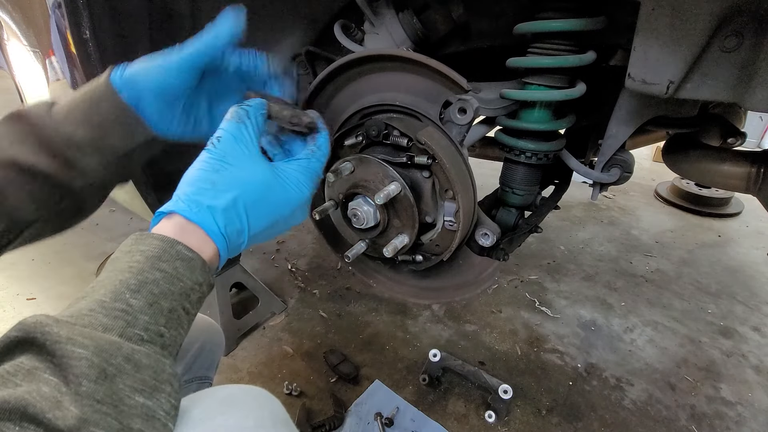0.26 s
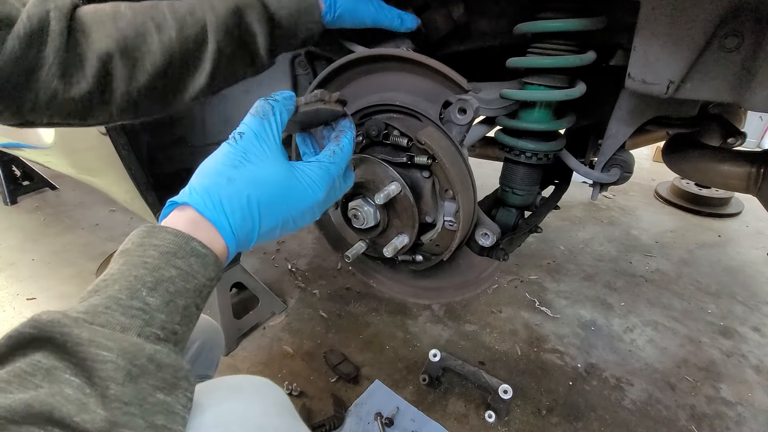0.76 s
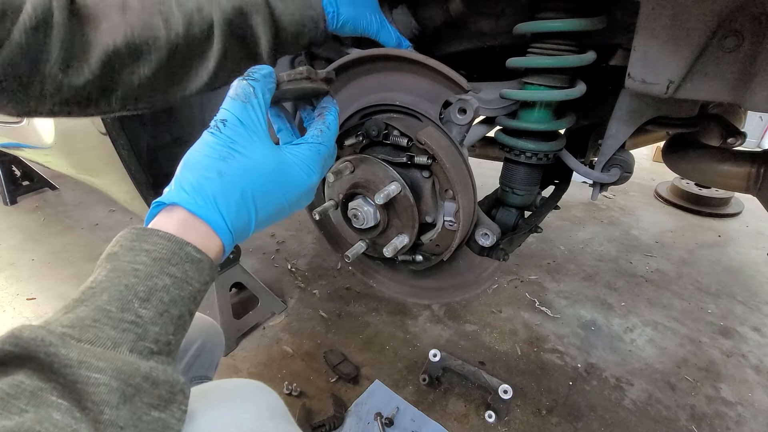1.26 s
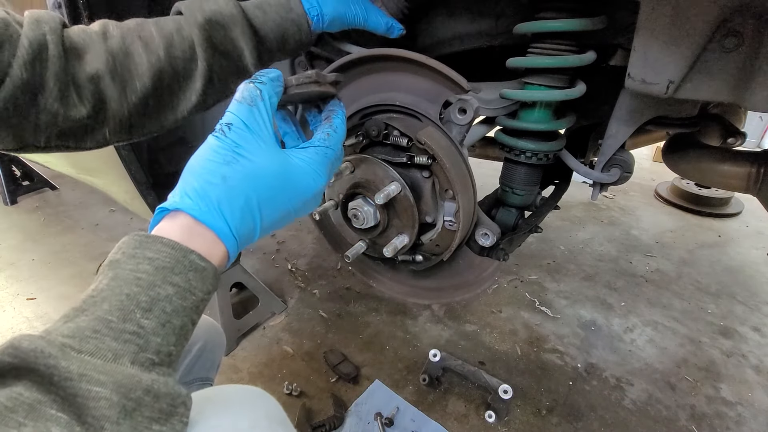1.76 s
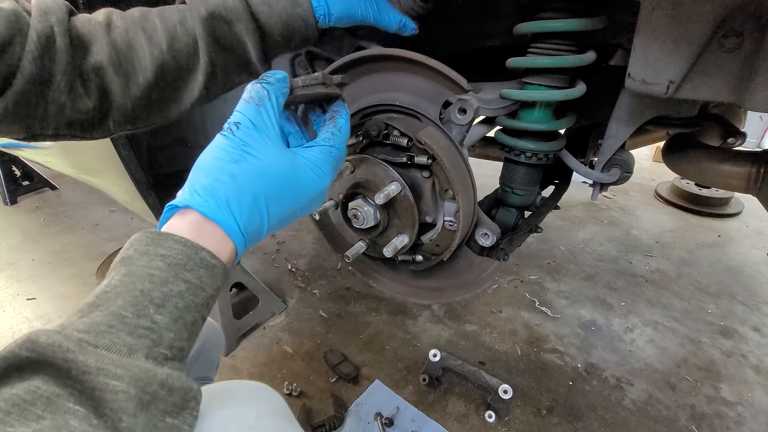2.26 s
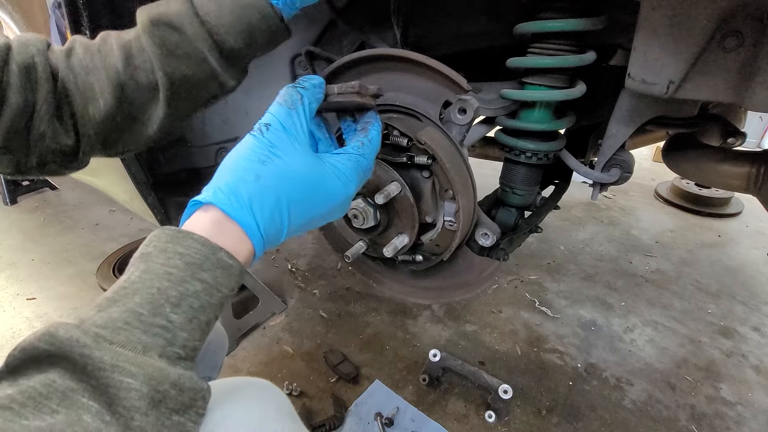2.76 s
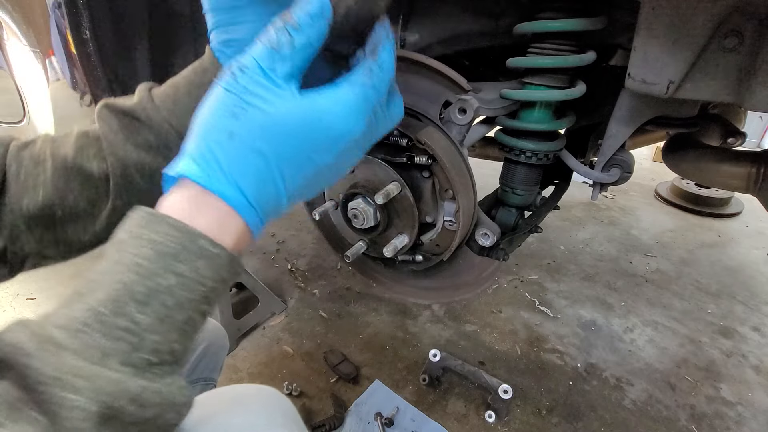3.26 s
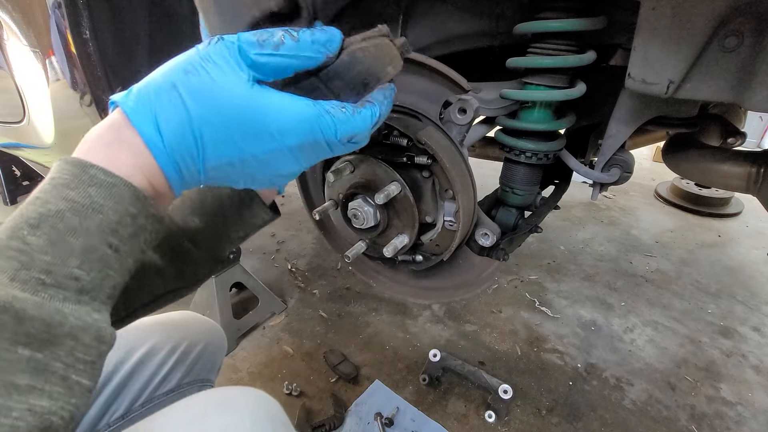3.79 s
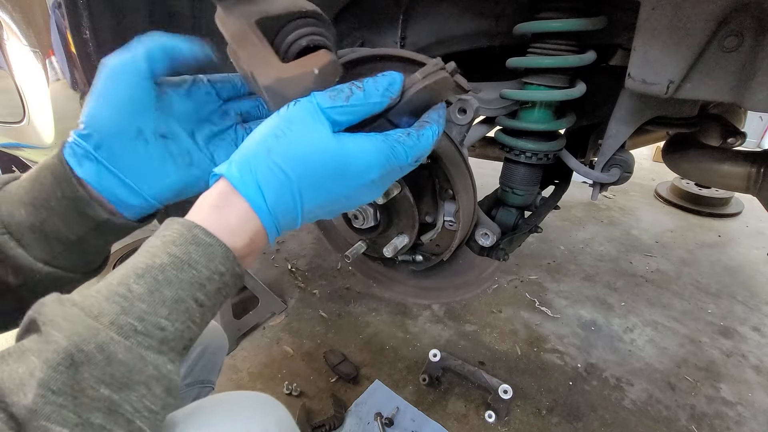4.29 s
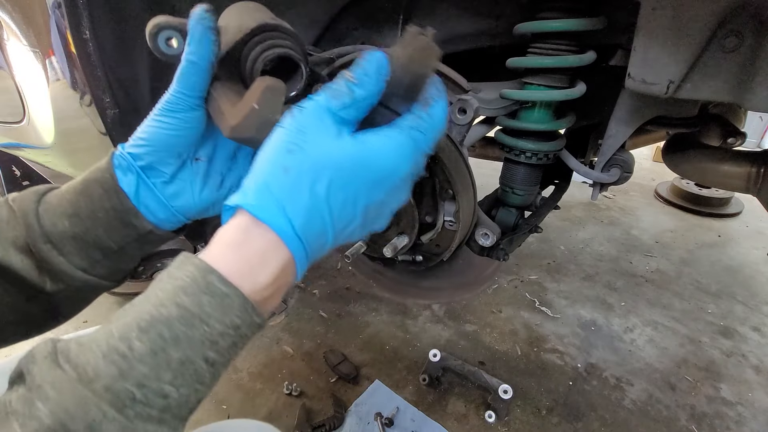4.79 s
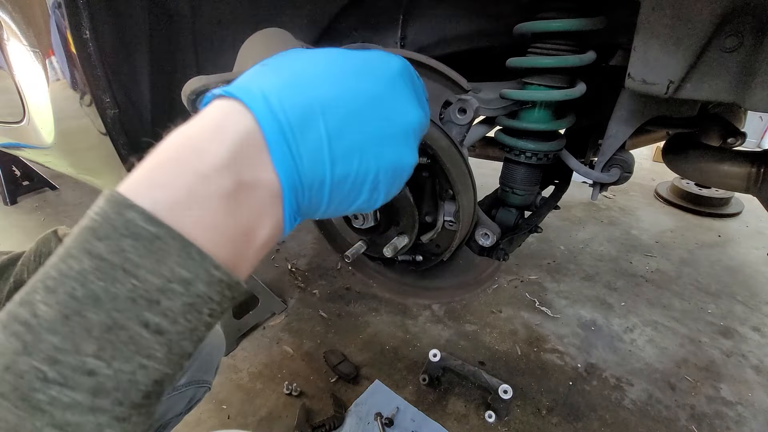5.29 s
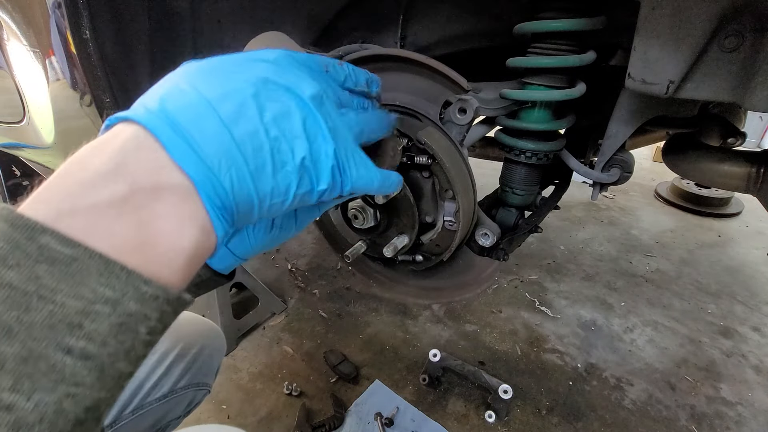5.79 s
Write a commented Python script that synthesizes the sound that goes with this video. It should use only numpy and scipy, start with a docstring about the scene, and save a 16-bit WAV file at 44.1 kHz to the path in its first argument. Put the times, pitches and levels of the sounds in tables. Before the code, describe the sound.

In a quiet garage, a dull metal caliper clunks and drags loudly, glove swishes follow, and bright brake-pad clacks come near the end.

```python
"""Brake work in a home garage, heard close up through two microphone ports.
Over steady low room noise and hiss (filtered noise), a bird far outside whistles twice (wavering tones).
From about 0.7 s a heavy caliper is knocked and dragged in the wheel arch (ringing modes and cracks);
low sways of the suspension (decaying sines) go with it. Gloves and sleeves rustle throughout (noise), then
narrow scuffs sing (noise in one band); steel pads clink at 2.2 s and near the end (modes and clatter)."""
import sys
import numpy as np
from scipy import signal
from scipy.fft import rfft, irfft
from scipy.io import wavfile
from scipy.ndimage import uniform_filter1d

SR = 44100
rng = np.random.default_rng(int(sys.argv[2]) if len(sys.argv) > 2 else 0)


def master(y):
    """Save y as 16-bit WAV."""
    cut = np.clip(np.atleast_2d(y).T, -1, 1)
    pcm = np.round(cut * 32767)  # scale
    wavfile.write(sys.argv[1], SR, pcm.astype(np.int16))


N = 266805  # samples in the scene


def caliper():
    """Cast iron hits and scrapes metal: the wheel arch booms, the casting knocks, the contact cracks."""
    # caliper blows: t/s, boom of the arch: level/dB, knock of the casting: level/dB, tick: level/dB
    blows = [(.765, -34, -39, -41), (1.18, -22.5, -22, -38), (1.199, -7.5, -8.5, -23), (1.23, -7, -5, -23),
             (1.213, -15.5, -21.5, -41), (1.263, -19, -20, -31), (1.27, -13.5, -17.5, -27.5),
             (1.281, -22.5, -21.5, -37.5), (1.293, -17, -29, -58), (1.345, -30.5, -25.5, -39.5),
             (1.353, -31.5, -21, -39), (1.378, -25.5, -28.5, -41.5), (1.388, -20, -39, -59),
             (1.424, -22.5, -53.5, -56.5), (1.483, -33.5, -23, -34), (1.598, -33, -27.5, -28.5),
             (1.77, -40.5, -38.5, -54), (1.78, -32.5, -36, -48), (1.832, -32.5, -38, -51),
             (1.845, -33, -37, -67), (2.013, -33.5, -29, -53.5), (2.031, -43.5, -39, -42),
             (2.191, -26, -14.5, -22.5), (2.2, -21, -20.5, -23), (2.224, -25.5, -22.5, -25),
             (2.234, -22.5, -23.5, -29), (2.436, -20, -10, -27), (4.232, -50, -46, -46),
             (4.286, -63, -45.5, -45), (5.733, -53, -39, -45)]
    # ringing modes of the wheel arch: f/Hz, level/dB, time to fall 60 dB before scaling by the blow/s
    arch = [(171.8, -11, 0.12), (227.5, -4.5, 0.09), (262.7, 1, 0.13), (319, -4, 0.048), (374, -4, 0.11)]
    # ringing modes of the casting: f/Hz, level/dB, time to fall 60 dB before scaling by the blow/s
    casting = [(454, -8.5, 0.08), (480.9, -1.5, 0.043), (576.6, -5.5, 0.1), (622, 1.5, 0.04),
               (733, 2, 0.087), (814, -3, 0.08), (995, 3, 0.037), (1142, -2.5, 0.1), (1235, -4.5, 0.15),
               (1382, -3.5, 0.086), (1613, -10, 0.066), (1930, -11.5, 0.077), (2390, -12.5, 0.12),
               (2860, -19, 0.081)]
    # colour of the contact's crack: f/Hz, level/dB
    contact = [(900, -31), (1700, -1), (3000, -7), (4500, -15), (7200, -19), (8500, -34), (16000, -37)]
    # share of the caliper that is opposite in the two ports: f/Hz, level/dB
    arch_side = [(60, 0), (200, -20.5), (380, 0.5), (700, 0), (2400, -0.5)]
    # left goes up and right goes down by this much (negative: the reverse): f/Hz, level/dB
    arch_lean = [(125, -1), (260, 0.5), (520, -1), (1000, 0), (2400, 0)]
    # a body: modes, rise/s, first swing/s, later ring/dB, spread of close modes as a share of pitch
    iron = [(arch, .0045, .005, -8, .012),
            (casting, .001, .005, -13, .014)]
    thud = (contact, 0.0027, .015, -10)  # colour, first burst/s, rattle/s, rattle level/dB
    knocks = strikes(blows, iron, thud, long=0.89, damp=-0.27, hard_db=3, edge=0.63, main_body=1)
    dry_iron = knocks + drags(iron, thud)
    left, right = ports(dry_iron, arch_side, 0.71) + amp(-14.0) * echoes(dry_iron[0], arch_side)
    opposite_lean = [(hz, -db) for hz, db in arch_lean]
    return np.array([colour(left, arch_lean), colour(right, opposite_lean)])


def drags(rings, contact):
    """Uneven slips of cast iron on metal keep the same bodies ringing, damped by the contact."""
    # caliper dragged, one row a stroke: start t/s, hardest t/s, end t/s, level/dB, grittiness/dB
    strokes = [(0.667, 0.751, .8, -48, 7), (0.79, 0.805, 1.154, -55.5, 9.5), (0.936, 0.952, 2.1, -62, 3),
               (1.234, 1.272, 1.368, -27, 0.5), (1.332, 1.363, 1.394, -35, -0.5),
               (1.37, 1.477, 1.569, -34.5, 2.5), (1.853, 1.947, 2.03, -39.5, -3),
               (1.9, 1.987, 2.16, -39.5, 1)]
    # how arch, casting and grit follow a stroke: level/dB, change in dB per dB of grittiness
    drag_mix = [(4.5, -0.47), (-2.5, 0.5), (-15, 2.18)]
    ease_s = .015  # a stroke swells for at least this long and fades for at least twice as long
    ends_db = -24  # depth of the swell; subtracted below, so a stroke starts and ends in silence
    slip_size = rng.standard_normal(N) * amp(3 * np.minimum(rng.exponential(1, N), 4))
    slips = slip_size * (rng.random(N) < 1200 / SR)  # about 1200 slips a second
    t, out = np.arange(N) / SR, np.zeros((2, N))
    answers = [ring(rings[0], 0.47, 0), ring(rings[1], 0.27, 0), crack(contact, 1.0)]
    for answer, (mix_db, slope) in zip(answers, drag_mix):
        body = evened(signal.oaconvolve(slips[None], answer, axes=1)[:, :N])
        for start, top, end, db, grit_db in strokes:
            corners = [min(start, top - ease_s), top, max(end, top + 2 * ease_s)]
            swell = amp(np.interp(t, corners, [ends_db, 0, ends_db])) - amp(ends_db)
            out += body * swell * amp(db + mix_db + slope * grit_db)
    return out


def pads():
    """Steel pads clink: three groups of modes ring while the contact clatters."""
    # pad clinks: t/s, low ring level/dB, middle ring level/dB, high ring level/dB, clatter level/dB
    clinks = [(2.226, -21, -43, -63.5, -47), (5.545, -22.5, -24, -40.5, -21.5),
              (5.859, -15.5, -40, -14.5, -8.5), (5.869, -17, -15.5, -15, -7.5),
              (5.948, -21, -17, -31, -22.5), (5.967, -44, -46, -33.5, -53)]
    # low modes of a pad: f/Hz, level/dB, time to fall 60 dB before scaling by the blow/s
    pad_low = [(1110, -2, 0.03), (1250, -3, 0.33), (1345, 2, 0.13), (1770, -7, 0.2), (2003, -10, .16),
               (2330, -8, 0.15)]
    # middle modes of a pad: f/Hz, level/dB, time to fall 60 dB before scaling by the blow/s
    pad_middle = [(2917, 0.5, 0.23), (2995, -9.5, 0.1), (3200, -9.5, 0.1)]
    # high modes of a pad: f/Hz, level/dB, time to fall 60 dB before scaling by the blow/s
    pad_high = [(3890, 7, 0.077), (4045, 1.5, 0.54), (5270, -2.5, 0.23), (5394, -6.5, 0.53),
                (5270, -12, 0.14), (7380, -8.5, .08), (8800, -8.5, 0.044), (10070, -8, 0.15),
                (10950, -15, 0.1)]
    # colour of the clatter: f/Hz, level/dB
    clatter = [(200, -16), (450, -6.5), (800, -2), (1500, 1), (4000, 3.5), (6000, -7), (9000, -13.5),
               (11500, -54), (13000, -35)]
    # share of the pads that is opposite in the two ports: f/Hz, level/dB
    pad_side = [(400, 0.9), (1290, 4.4), (2400, 2.4), (4400, 4.3), (9000, 0.81)]
    # a body: modes, rise/s, first swing/s, later ring/dB, spread of close modes as a share of pitch
    steel = [(pad_low, .0006, .005, -11, .008),
             (pad_middle, .0012, .01, -9, .006),
             (pad_high, .001, .008, -6, .01)]
    clash = (clatter, 0.0041, 0.036, -11)  # colour, first burst/s, rattle/s, rattle level/dB
    dry_steel = strikes(clinks, steel, clash, long=0.55, damp=-0.012, hard_db=-2.5, edge=0.9, main_body=0)
    return ports(dry_steel, pad_side, 0.8) + amp(-11.5) * echoes(dry_steel[0], pad_side)


def strikes(events, rings, contact, long, damp, hard_db, edge, main_body):
    """Every blow rings each body and cracks at the contact; dull blows die sooner, sharp ones ring high."""
    # long: ring length factor; damp: its change in dB per dB that the lowest body outweighs the next
    # hard_db: hardness, dB per octave; edge: its change per dB that the contact outweighs the main body
    out = np.zeros((N, 2))
    for s, *levels_db, crack_db in events:
        lasts = long * amp(damp * (levels_db[0] - levels_db[1]))
        hardness = hard_db + edge * (crack_db - levels_db[main_body])
        for db, body in zip(levels_db, rings):
            add(out, s, amp(db) * ring(body, lasts, hardness).T)
        add(out, s, amp(crack_db) * crack(contact, lasts).T)
    return out.T


def ring(body, long, hard_db):
    """One blow in two versions with other phases: close bunches of modes, loud at first, then ringing on."""
    soft_rise = 0.24  # soft blows swell more slowly: dB of rise time per dB per octave
    modes, rise, first, tail_db, split = body
    hz, db, t60 = np.transpose(modes * 5)  # five close modes in each bunch
    step = np.arange(96) / SR
    t = np.arange(len(step) ** 2) / SR
    spot, off, phase, other = rng.standard_normal((len(hz), 4)).T
    size = amp(db + 1.2 * spot + hard_db * np.log2(hz / hz[0]))  # hard blows reach the upper modes
    decay = np.log(1000) / np.maximum(t60 * long, .005)
    pole = 2j * np.pi * hz * (1 + split * off) - decay
    phases = np.exp([.8j * phase, 3j * other])[:, None]
    starts = size * phases * np.exp(np.outer(step * len(step), pole))
    # block starts times steps within a block
    waves = (starts @ np.exp(np.outer(pole, step))).imag.reshape(2, -1)
    swell = (1 - np.exp(-t / (rise * amp(-soft_rise * hard_db)))) ** 2
    fall = np.exp(-t / (first * long)) + amp(tail_db)
    waves *= swell * fall * (1 - (t / t[-1]) ** 2)
    return waves / abs(waves[0]).max()  # the first version peaks at 1


def crack(body, long):
    """Too many modes to tell apart: a sharp burst of coloured noise with a weaker rattle behind it."""
    spectrum, first, after, tail_db = body
    t = np.arange(SR // 5) / SR
    burst = evened(colour(rng.standard_normal((2, len(t))), spectrum)) * (1 - np.exp(-t / 0.0014))
    return burst / 2 * (np.exp(-t / (first * long)) + amp(tail_db) * np.exp(-t / (after * long)))


def sways():
    """Soft low pushes of spring and body as the suspension sways: sines that swell and die away."""
    # sways: t/s, level/dB, f/Hz, time to fall 60 dB/s
    pushes = [(0.681, -46, 114, 0.12), (1.2, -41, 65, 0.8), (1.261, -27, 95, 0.22),
              (1.35, -41.5, 61.8, 0.37), (1.45, -39, 65, 0.31), (1.519, -40.5, 104.7, 0.2),
              (2.11, -25, 59.5, 0.1), (2.168, -36, 56.4, 0.36), (2.438, -46, 70.6, 0.18)]
    out, t = np.zeros(N), np.arange(SR // 2) / SR
    for s, db, hz, t60 in pushes:
        swell = 1 - np.exp(-t / 0.0087)
        add(out, s, amp(db - 60 * t / t60) * np.sin(2 * np.pi * hz * t) * swell * 2)
    return out


def cloth():
    """Fine friction noise of cloth and gloves: a slow rustle and quick swishes, body and sheen apart."""
    # cloth and gloves moving: t/s, level/dB
    rustle = [(0.0, -72.5), (0.521, -68.5), (0.76, -53), (1.14, -70.5), (1.376, -64), (1.648, -74.5),
              (2.68, -61), (3.03, -67.5), (3.28, -64.5), (3.45, -60.5), (4.04, -61), (4.8, -64.5),
              (5.37, -63), (5.91, -60.5), (6.05, -73)]
    # colour of the rustle: f/Hz, level/dB
    rustle_colour = [(500, 5.5), (1500, 6), (3500, 4.5), (6800, 7.5), (8100, -0.5), (14500, 2.5),
                     (16000, 2)]
    # quick swishes of a glove: t/s, level/dB, brightest f/Hz, sheen level/dB, length/s
    swishes = [(0.203, -62.5, 4650, -22, 0.041), (0.705, -49, 4500, -3, 0.065),
               (0.952, -52.5, 4400, -8.5, 0.049), (1.479, -51, 2530, -4, 0.091),
               (2.122, -58, 5300, -9, 0.032), (2.679, -63.5, 2600, -17, 0.14),
               (2.797, -61.5, 2280, -13, 0.12), (3.34, -56, 5010, -12, 0.074),
               (3.569, -58.5, 3060, -15, 0.13), (3.848, -54.5, 6360, -19, 0.12),
               (4.046, -56, 4940, -10, 0.078), (4.173, -54.5, 4250, -17, 0.046),
               (4.224, -48, 6400, -37, 0.11), (4.276, -49, 6550, -13, 0.086),
               (4.419, -58, 4230, -11, 0.068), (4.449, -52.5, 7040, -8, .085),
               (4.5095, -51.5, 4460, -4.5, 0.073), (4.647, -60, 7000, -4, 0.14),
               (4.743, -55, 4530, -15, 0.047), (5.104, -55.5, 5850, -7.5, 0.094),
               (5.312, -62.5, 5900, -19, 0.084), (5.656, -54, 6540, -7, 0.054),
               (5.818, -46, 6030, -5, 0.074)]
    # share of the cloth that is opposite in the two ports: f/Hz, level/dB
    cloth_side = [(500, 2), (2400, 1), (8000, 0.011)]
    # sheen above 8 kHz at a rustle of -65 dB; it gains this many dB more per dB of rustle
    sheen_db, sheen_grows = -5.5, 0.23
    t, hz = np.arange(N) / SR, np.fft.rfftfreq(N, 1 / SR)
    level_db = np.interp(t, *np.transpose(rustle))
    over_db = level_db + 65
    body, sheen = amp(level_db), amp(level_db + sheen_db + sheen_grows * over_db)
    out = []
    for _ in range(2):  # two unrelated noises: one alike in the ports, one opposite
        fibres = rfft(noise(rustle_colour, count=N, patchy_db=3.0, flicker_db=2.35))
        low = evened(irfft(fibres * (hz < 8000), N))
        high = evened(irfft(fibres * (hz >= 8000), N))
        mix = low * body + high * sheen
        for at, peak_db, bright_hz, shine_db, long in swishes:
            u = np.arange(SR // 5) / SR / long
            shape = (3 * u * np.exp(1 - 3 * u)) ** 2 * amp(peak_db)
            grit = evened(uniform_filter1d(rng.standard_normal(len(u)), size=150))
            shape = shape * amp(0.72 * grit)  # gritty, the rubber catches
            at = at - 0.23 * long  # the swish swells before it stands out
            band = [(300, -30), (bright_hz / 3.2, -12), (bright_hz, 0), (bright_hz + 2000, -9), (20000, -40)]
            catches = rng.standard_normal(len(u)) * amp(2.8 * np.minimum(rng.exponential(1, len(u)), 5))
            add(mix, at, shape * evened(colour(catches, band)))
            add(mix, at, shape * amp(shine_db) * high[round(at * SR):][:len(u)])
        out.append(mix)
    side = colour(out[1], cloth_side)
    return np.array([out[0] + side, out[0] - side])


def scuffs():
    """Light rubbing that sings faintly: noise held in one narrow band."""
    # scuffs: start t/s, length/s, f/Hz, level/dB
    rubs = [(2.512, 0.14, 2040, -65), (2.61, 0.11, 2820, -63), (2.638, 0.28, 2075, -66.5),
            (2.67, 0.09, 1680, -66), (3.455, 0.24, 1260, -66), (4.156, 0.042, 3920, -54),
            (4.228, 0.13, 397, -59), (4.416, 0.034, 3970, -60), (4.483, 0.083, 1224, -64)]
    width = 0.043  # share of pitch
    out = np.zeros(N)
    for s, long, hz, db in rubs:
        band = [(hz * (1 - 4 * width), -40), (hz * (1 - width), -6), (hz, 0),
                (hz * (1 + width), -6), (hz * (1 + 4 * width), -40)]
        sung = evened(colour(rng.standard_normal(round(long * SR)), band))
        add(out, s, amp(db) * sung * signal.windows.tukey(len(sung), .5))
    return out


def bird():
    """Two thin, unsteady whistles: rising sines whose pitch and loudness waver together."""
    # far bird: start t/s, length/s, starting f/Hz, level/dB
    whistles = [(0.097, .26, 2700, -78.5), (0.407, 0.18, 2640, -75.5)]
    rise = 0.099  # share of pitch gained per second
    out = np.zeros(N)
    for s, long, hz, db in whistles:
        t = np.arange(0, long, 1 / SR)
        waver = 12 * evened(uniform_filter1d(rng.standard_normal(len(t)), size=400))  # Hz
        pitch = hz * (1 + rise * t) + waver
        tone = np.sqrt(2) * np.sin(2 * np.pi * np.cumsum(pitch) / SR)
        add(out, s, tone * amp(db + 0.39 * waver) * signal.windows.tukey(len(t), .5))
    return out


def room():
    """Steady low noise and hiss of the garage: one noise common to the ports, one opposite in them."""
    # colour of the noise common to both ports: f/Hz, level/dB
    room_mid = [(12, -12.5), (20, -10.5), (70, 3), (127, -5.5), (146, -10), (328, -9.5), (780, -11),
                (1220, -23.5), (2260, -28), (2670, -25), (7110, -42), (16000, -43.5)]
    # colour of the noise opposite in the ports: f/Hz, level/dB
    room_side = [(12, -42), (20, -13), (65, -17), (277, -18), (319, -10), (642, -4), (2670, -25.5),
                 (11100, -41), (16000, -31.5)]
    mid = amp(-59) * noise(room_mid, count=N, patchy_db=0.6, flicker_db=-1.22)
    side = amp(-59.5) * noise(room_side, count=N, patchy_db=1.0, flicker_db=1.0)
    return np.array([mid + side, mid - side])


def echoes(x, side):
    """Sparse taps of random sign, each band dying at its own speed; one tail for the mid, one for the side."""
    # how long the echoes last: f/Hz, time to fall 60 dB/s
    echo_t60 = [(200, 0.39), (1500, 0.28), (8000, 0.23)]
    taps = np.zeros((2, SR // 2))
    at = np.arange(200, SR // 2 - 20, 20) + rng.integers(0, 20, (2, (SR // 2 - 201) // 20))
    np.put_along_axis(taps, at, rng.choice([-1., 1.], at.shape), 1)
    hz, t, z = signal.stft(taps, SR, nperseg=256)
    fall = amp(-60 * t / read(echo_t60, hz)[:, None])
    tail = signal.istft(z * fall, SR, nperseg=256)[1]
    mid, apart = signal.oaconvolve(x[None], tail / np.linalg.norm(tail[0]), axes=1)[:, :N]
    apart = colour(apart, side)
    return np.array([mid + apart, mid - apart])


def ports(pair, side, alike):
    """The two ports hear one wave out of step: the side is partly the mid turned a quarter cycle."""
    alike = np.clip(alike, 0, 1)
    quarter_turn = signal.hilbert(pair[0]).imag
    turned = colour(alike * quarter_turn + np.sqrt(1 - alike ** 2) * pair[1], side)
    return np.array([pair[0] - turned, pair[0] + turned])


def noise(spectrum, count, patchy_db, flicker_db):
    """Random short-time spectra with drifting patches and a flicker common to all bands, rms 1."""
    a, b, patches = rng.standard_normal((count // 128 + 8, 257, 3)).T
    flicker = evened(uniform_filter1d(patches[0], size=14))
    patches = evened(uniform_filter1d(uniform_filter1d(patches, size=6, axis=0), size=20, axis=1))
    z = (a + 1j * b) * amp(patchy_db * patches + flicker_db * flicker)
    return evened(colour(signal.istft(z, nperseg=512, noverlap=384)[1][:count], spectrum))


def colour(x, points):
    """Filters x by a table of f/Hz, level/dB."""
    gain = amp(read(points, np.fft.rfftfreq(x.shape[-1], 1 / SR)))
    return irfft(rfft(x) * gain, x.shape[-1])


def read(points, hz):
    """Reads a table between its points, along a logarithmic pitch scale."""
    f, value = np.transpose(points)
    return np.interp(np.log(hz + 1), np.log(f + 1), value)


def amp(db):
    """Turns decibels into a plain factor."""
    return 10 ** (np.asarray(db) / 20)


def evened(x):
    """Scales x to an rms of 1."""
    return x / np.sqrt(np.mean(x ** 2) + 1e-20)


def add(mix, s, sound):
    """Adds a sound to the mix at s seconds, cut off at the end of the mix."""
    part = mix[round(s * SR):][:len(sound)]
    part += sound[:len(part)]


def scene():
    """All sources together, from the caliper to the room."""
    return caliper() + pads() + sways() + cloth() + scuffs() + bird() + room()


def record(dry):
    """The microphones drop the deepest bass, peaks meet the ceiling of the recorder; then the band limit."""
    edge_hz = 15830
    bass_cut = signal.butter(2, 38, "high", fs=SR, output="sos")
    held = np.clip(signal.sosfilt(bass_cut, dry), -1, 1)
    band_limit = signal.firwin(511, edge_hz, window=("kaiser", 9), fs=SR)
    return signal.oaconvolve(held, band_limit[None], "same")


dry = scene()
out = record(dry)
master(out)
```